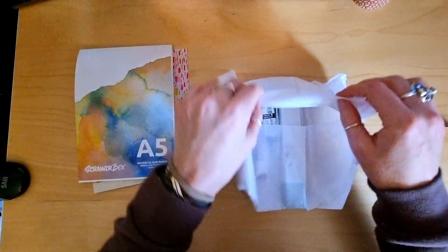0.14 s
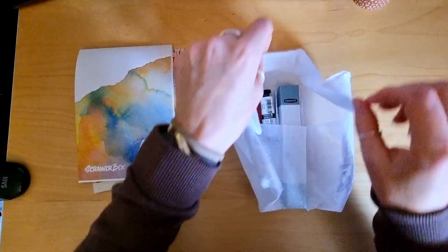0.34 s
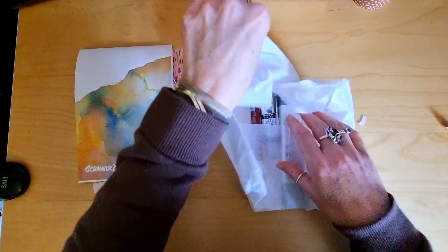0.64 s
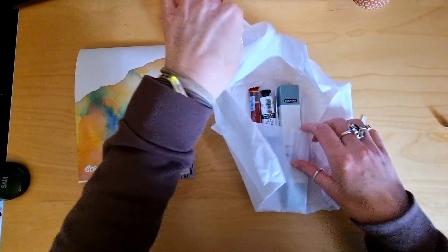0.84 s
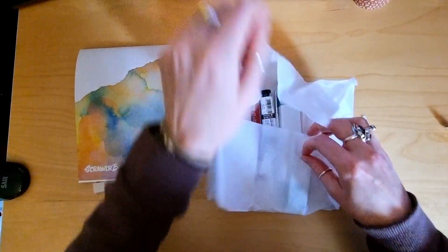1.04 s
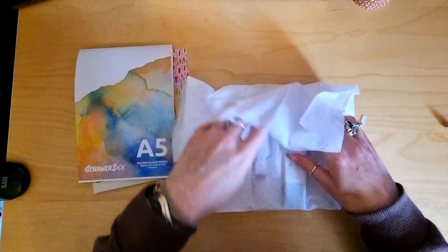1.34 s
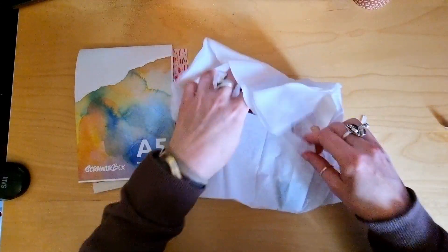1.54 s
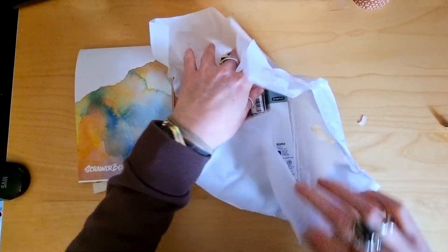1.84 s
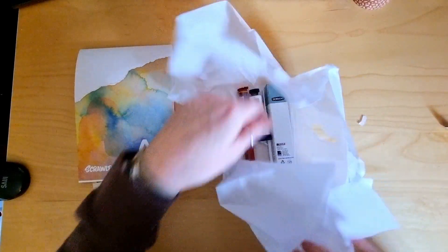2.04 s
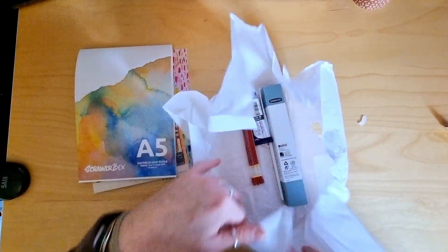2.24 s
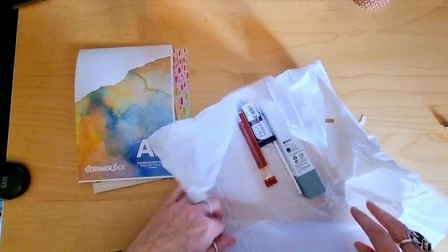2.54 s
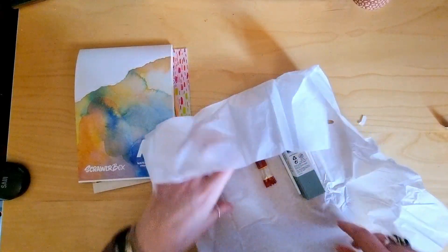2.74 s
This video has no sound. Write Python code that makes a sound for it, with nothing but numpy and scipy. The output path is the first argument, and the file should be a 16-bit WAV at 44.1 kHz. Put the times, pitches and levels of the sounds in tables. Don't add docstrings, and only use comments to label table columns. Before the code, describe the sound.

Thin tissue paper crinkles close by, bright and dry, over soft sliding on wood. Light rustles and snaps begin, with denser crackling around 0.6-1.1 seconds. It thins to tiny ticks near 1.2-1.4, then swells at 1.5-1.7 with a soft table thud. Busy rustling continues from 2, strongest around 2.5-2.8 with a firmer low thump, then eases. Short small-room reflections, faint air noise, stereo phone microphone.

```python
import sys
import numpy as np
from scipy import signal
from scipy.fft import rfft, irfft, next_fast_len
from scipy.io import wavfile
from scipy.ndimage import uniform_filter1d

SR = 44100
rng = np.random.default_rng(int(sys.argv[2]) if len(sys.argv) > 2 else 0)


def put_to_file(sound):
    columns = np.atleast_2d(sound).T
    safe = np.clip(columns, -1, 1)
    whole_steps = np.round(safe * 32767)
    wavfile.write(sys.argv[1], SR, whole_steps.astype(np.int16))


def field_ratio(decibels):
    return 10 ** (np.asarray(decibels, dtype=float) / 20)


N = 127890
T = np.arange(N) / SR

# start_s, effort_db, sliding_db, table_load_db
HANDS = [(0, -41.5, -9, -1), (.05, -50, -1, 1), (.11, -41.5, -4, -3), (.47, -45, -5, 0),
         (.55, -53.5, -1.5, -0.5), (.64, -41.5, -1.5, 2.5), (1.0, -41, -10, 3), (1.14, -45.5, -3.5, -2.5),
         (1.155, -61, -3.5, 2), (1.265, -59, -3.5, 1), (1.365, -69, 8, 5), (1.39, -49.5, -2.5, 2),
         (1.77, -40.5, -3, 1.5), (2.27, -40.5, -5, 1), (2.5, -41.5, -3, 1), (2.7, -34, -15, 3),
         (2.82, -40.5, -12.5, 7.5), (2.9, -41, -14, -12)]
# middle_s, half_length_s, level_db
FOLDS = [(0.158, 0.035, -39), (0.306, 0.013, -45), (0.37, 0.024, -42.5), (0.517, 0.0063, -46),
         (0.707, 0.029, -37.5), (0.775, 0.023, -41.5), (0.889, 0.061, -34.5), (1.06, 0.063, -39.5),
         (1.187, 0.021, -45.5), (1.408, 0.022, -38), (1.521, 0.059, -32.5), (1.645, 0.077, -34.5),
         (1.97, 0.026, -34.5), (2.026, 0.026, -37.5), (2.165, 0.047, -39), (2.318, 0.023, -43.5),
         (2.37, 0.036, -34), (2.427, 0.017, -36), (2.579, 0.039, -33), (2.589, 0.0072, -27),
         (2.64, 0.026, -32), (2.732, 0.018, -37), (2.252, 0.0044, -33.5), (2.795, .012, -38.5),
         (2.77, 0.028, -27.5)]
# start_s, peak_db, body_db
SNAPS = [(0.163, -19.5, -32), (0.2875, -19.5, -8), (0.5601, -27.5, -19), (0.5801, -25.5, -3),
         (0.603, -23.5, -6), (0.6305, -19.5, -26), (0.6759, -14.5, -10), (0.7233, -17.5, -30),
         (0.7562, -16.5, -31), (0.7901, -16, -30), (1.1318, -18.5, -23), (1.1772, -36, -17),
         (1.2326, -28.5, -6), (1.274, -32, 0), (1.3014, -35, 0), (1.3573, -30.5, -15), (1.385, -33, -10),
         (1.4067, -22, -23), (1.4651, -17.5, -2.5), (1.7873, -18.5, -28), (1.8402, -16.5, -35),
         (1.9435, -43, 6), (2.0223, -26, -22), (2.2503, -19, -14), (2.3491, -17, -20), (2.4653, -20.5, -3),
         (2.5232, -16.5, -36), (2.5431, -17, -24), (2.6249, -17, -30), (2.7606, -24.5, -30),
         (.0592, -38, -10), (.0732, -23.5, -36), (.108, -24, -20), (.172, -19.5, -24), (.2374, -36, -14),
         (.297, -33, -16), (.309, -24, -2), (.416, -26, -16), (.455, -24.5, -11), (.819, -25, -22),
         (.861, -32, -15), (.966, -30, -20), (1.19, -28, -16), (1.312, -35, -14), (1.675, -26, -18),
         (1.9145, -22, -12), (1.9594, -30, -14), (2.034, -25, -16), (2.3022, -19.5, -28),
         (2.4179, -35, -16), (2.5551, -16, -25), (2.589, -12.5, -24), (2.801, -18, -30), (2.851, -22, -24)]
# start_s, peak_db, body_db
TICKS = [(0.3234, -20, -20), (0.6874, -14.5, -15), (0.7012, -16, -1.5), (0.7423, -16, -27),
         (0.7738, -24.5, -20), (0.8459, -18.5, -7), (0.9064, -23, -5), (1.3294, -36.5, -1),
         (1.3448, -38, -14), (1.4964, -18.5, 3), (1.5694, -12.5, -17), (1.9646, -35, -17),
         (2.3835, -14, -23), (2.581, -19, -23), (2.7074, -16, -23), (1.224, -30, -16), (1.2405, -40, -13),
         (1.375, -40, -14), (2.5275, -28, -22), (1.948, -30, -6)]
# middle_s, half_length_s, pitch_hz, level_db
POCKETS = [(0.107, 0.0058, 2450, -41), (.16, 0.08, 2100, -53.5), (0.313, 0.006, 940, -44),
           (0.698, 0.02, 2000, -47), (0.906, 0.0062, 1055, -42), (0.265, 0.012, 1830, -49.5),
           (1.045, 0.014, 1240, -47.5), (1.133, 0.0067, 3350, -41.5), (1.535, 0.049, 1190, -43.5),
           (2.142, 0.028, 1220, -48), (2.565, 0.031, 824, -47.5), (.365, .03, 1750, -57),
           (0.586, 0.015, 960, -51), (.85, 0.0094, 1310, -57), (1.088, 0.015, 4000, -46.5),
           (1.49, 0.011, 2380, -48.5), (1.67, .012, 4650, -49), (1.918, 0.011, 1250, -47),
           (1.98, .03, 1130, -49), (2.21, 0.012, 1400, -51.5), (2.252, .01, 1250, -50),
           (2.46, 0.017, 2160, -48), (2.525, 0.0049, 3400, -45), (2.578, 0.0048, 2930, -48)]
# start_s, peak_db, knock_hz, push_db, ring_db
THUDS = [(.004, -45, 185, -42, -4), (0.513, -42, 190, -30, -18), (0.701, -35.5, 216, -30, -9),
         (0.905, -33, 305, -39, -23), (1.061, -62, 200, 16, -9), (1.39, -57, 202, 14, -6),
         (1.447, -30, 250, -14, -9), (1.47, -57, 200, 19, -15), (1.56, -46, 261, -20, -1.5),
         (2.273, -53, 200, 13, -7), (2.31, -41, 220, 5, -6), (2.434, -50, 200, 23, -3),
         (2.56, -42, 204, 12, -1.5), (2.85, -59, 200, 20, -8), (2.7757, -24.5, 263, -2, -6.5)]
# frequency_hz, density_db
PAPER_COLOUR = [(1500, -7), (2400, -6.5), (3300, 0), (9000, 0.5), (13000, 0), (15300, 2.5)]
# frequency_hz, density_db
SLIDE_COLOUR = [(250, -6), (500, -2.5), (650, -7), (850, -1), (1250, -0.5), (2000, -5), (3200, -3),
                (6000, -15)]
# pitch_hz, level_db, t60_s
TABLE_MODES = [(127.5, -7, 0.66), (173, -9, 0.57), (191, 0.5, 0.19), (245.5, -7, 0.3), (505.7, -4, 0.098),
               (850, -18, 0.11)]
# frequency_hz, t60_s
ROOM_DECAY = [(200, 0.58), (1000, 0.21), (5000, 0.15), (14000, 0.057)]
# frequency_hz, density_db
AIR_COLOUR = [(40, -10), (100, -12), (300, -4), (520, -9), (2330, -8), (5400, -43), (15500, -27)]
# frequency_hz, side_minus_mid_db
WIDTH = [(60, -22), (150, -11.5), (380, -8), (950, -8.5), (2380, -2), (5980, 0.5), (15000, 0.5)]
# start_s, left_minus_right_db
PAN = [
    (0.0, -1.5),
    (0.09, 0),
    (0.8, -2.0),
    (1.52, 0),
    (2.83, -0.5),
    (2.86, -1.5),
    (2.9, 1.5),
]
# frequency_hz, gain_db
OVERALL_RESPONSE = [(20, -24), (50, -14.5), (95, -9.5), (120, -2), (15450, 2), (15850, -19), (16000, -69)]

CREASES_PER_S = 700
CRACKLE_DB, RUSTLE_DB, SLIDE_DB, SNAP_DB = -7.5, -6, -2.3, -13
HUM_DB, THUD_DB, KNOCK_DB = -54, -1, 2.5
REVERB_DB, AIR_DB = -9.5, -70


def evened(x):
    return x / np.sqrt(np.mean(x ** 2) + 1e-20)


def add(mix, s, sound):
    part = mix[..., max(round(s * SR), 0):][..., :sound.shape[-1]]
    part += sound[..., :part.shape[-1]]


def read(points, hz):
    f, value = np.transpose(points)
    return np.interp(np.log(hz + 1), np.log(f + 1), value)


def colour(x, points):
    n = next_fast_len(x.shape[-1])
    gain = field_ratio(read(points, np.fft.rfftfreq(n, 1 / SR)))
    return irfft(rfft(x, n) * gain, n)[..., :x.shape[-1]]


def noise():
    return rng.standard_normal((2, N))


def wander(seconds):
    size = max(int(seconds * SR), 1)
    return evened(uniform_filter1d(uniform_filter1d(rng.standard_normal(N), size), size))


def hands(column):
    return np.interp(T, np.transpose(HANDS)[0], np.transpose(HANDS)[column])


def effort(fold_share):
    power = field_ratio(2 * hands(1))
    for middle, half, db in FOLDS:
        power = power + fold_share * field_ratio(2 * db) * np.exp(-((T - middle) / half) ** 4)
    return np.sqrt(power)


def paper():
    snaps, bodies = snapping_creases()
    unit = rng.standard_normal(N)
    bright = colour(effort(0.63) * crackle() + snaps, [(700, -11), *PAPER_COLOUR])
    bright = bright / colour(unit, PAPER_COLOUR).std()
    dull = colour(sliding() + bodies, SLIDE_COLOUR) / colour(unit, SLIDE_COLOUR).std()
    return bright + dull + air_pockets()


def crackle():
    size = field_ratio(2 * np.minimum(rng.exponential(1, N), 3.5))
    size = size * (rng.random(N) < CREASES_PER_S / SR * field_ratio(1.5 * wander(0.008)))
    kind = rng.integers(0, 40, N)
    creases = np.zeros((2, N))
    for k in range(40):
        grain = burst(0.00057 * 5 ** rng.random(), 2000 * 7 ** rng.random(), 9.2)
        grain = grain / np.linalg.norm(grain)
        creases += signal.oaconvolve((size * (kind == k))[None], grain, axes=1)[:, :N]
    rustle = noise() * field_ratio(2.9 * wander(0.01) + 0.27 * wander(0.019))
    return patchy(field_ratio(CRACKLE_DB) * evened(creases) + field_ratio(RUSTLE_DB) * evened(rustle))


def burst(seconds, hz, tilt_db, rise=0.73):
    t = np.arange(int(0.055 * SR)) / max(seconds * SR, 4)
    x = colour(rng.standard_normal((2, len(t))), [(hz / 2, 0), (hz, tilt_db), (hz * 2, 0)])
    peak_to_one = (1 + rise) * (1 + 1 / rise) ** rise
    return evened(x) * (1 - np.exp(-t / rise)) * np.exp(-t) * peak_to_one


def patchy(x):
    z = signal.stft(x, nperseg=256)[2]
    field = rng.standard_normal(z.shape[:0:-1])
    field = uniform_filter1d(field, size=5, axis=0)
    field = uniform_filter1d(field, size=7, axis=1).T
    z = z * field_ratio(1.6 * evened(field))
    return evened(signal.istft(z, nperseg=256)[1][:, :N])


def snapping_creases():
    snaps, bodies = np.zeros((2, N)), np.zeros((2, N))
    for rows, seconds in ((SNAPS, 0.0022), (TICKS, 0.0015)):
        for s, db, body_db in rows:
            snap = burst(seconds, 3000 * 4 ** rng.random(), 1.5, rise=0.7)
            add(snaps, s, field_ratio(db + SNAP_DB) * snap)
            add(bodies, s, field_ratio(db + body_db + SNAP_DB) * burst(0.5 * seconds, 1200, 0))
    return snaps, bodies


def sliding():
    rub = noise() * field_ratio(2.8 * wander(0.0037) + 0.84 * wander(0.073))
    return effort(0.5) * field_ratio(hands(2) + SLIDE_DB) * evened(rub)


def air_pockets():
    out = np.zeros((2, N))
    grain = noise() * field_ratio(2.5 * wander(0.0046))
    t = np.arange(-6000, 6000) / SR
    width = 1.85
    for middle, half, hz, db in POCKETS:
        part = np.take(grain, np.round((middle + t) * SR).astype(int), axis=1, mode="wrap")
        band = colour(part, [(hz / width, -30), (hz, 0), (hz * width, -30)])
        sound = field_ratio(db) * evened(band) * np.exp(-(t / half) ** 2)
        start = middle + t[0]
        add(out, start, sound[:, max(-round(start * SR), 0):])
    return out


def table():
    t = np.arange(SR) / SR
    ring = sum(field_ratio(db - 60 * t / t60) * np.sin(2 * np.pi * hz * t) for hz, db, t60 in TABLE_MODES)
    return hum(ring) + thuds(ring, t)


def hum(ring):
    shake = noise() * field_ratio(0.17 * (hands(1) + 33) + hands(3) + 0.77 * wander(0.029))
    return field_ratio(HUM_DB) * signal.fftconvolve(shake, ring[None] / np.linalg.norm(ring), axes=1)[:, :N]


def thuds(ring, t):
    out = np.zeros((2, N))
    boom = 0.55 * np.sin(2 * np.pi * TABLE_MODES[0][0] * t)
    boom = boom * np.exp(-t / 0.09) * (1 - np.exp(-t / 0.049))
    modes = 1.6 * ring / abs(ring).max() + boom
    for s, db, hz, push_db, ring_db in THUDS:
        knock = np.sin(2 * np.pi * hz * t) + 0.14 * np.sin(3.8 * np.pi * hz * t)
        knock = field_ratio(KNOCK_DB) * np.exp(-t / 0.0055) * knock
        push = field_ratio(push_db) * np.sin(2 * np.pi * 62 * t)
        push = push * np.exp(-t / 0.019) * (1 - np.exp(-t / 0.0069))
        hit = -(field_ratio(ring_db) * modes + knock) * (1 - np.exp(-t / 0.0018))
        add(out, s, field_ratio(db + THUD_DB) * np.outer([1, -0.4], hit + push))
    return out


def room(x):
    out = np.zeros((2, N))
    at = np.arange(120, SR // 2 - 20, 20)
    for k in range(3):
        taps = np.zeros((2, SR // 2))
        places = at + rng.integers(0, 20, (2, len(at)))
        np.put_along_axis(taps, places, rng.choice([-1., 1.], (2, len(at))), 1)
        hz, t, z = signal.stft(taps, SR, nperseg=256)
        z = z * field_ratio(-60 * t / read(ROOM_DECAY, hz)[:, None])
        tail = signal.istft(z, SR, nperseg=256)[1]
        turn = np.sqrt(2 / 3) * np.cos(2 * np.pi * (9 * T + k / 3))
        out += signal.fftconvolve(x * turn, tail / np.linalg.norm(tail[0]), axes=1)[:, :N]
    return out


def air():
    return field_ratio(AIR_DB) * evened(colour(noise(), AIR_COLOUR))


def scene():
    sheet = paper()
    mid, side = sheet + field_ratio(REVERB_DB) * room(sheet) + table() + air()
    side = colour(side, WIDTH)
    pan = np.interp(T, *np.transpose(PAN))
    left = (mid + side) * field_ratio(1.16 + pan / 2)
    right = (mid - side) * field_ratio(1.03 - pan / 2)
    return np.array([left, right])


def band_limit(x):
    return signal.sosfilt(signal.butter(12, 16720, fs=SR, output="sos"), x)


def record(dry):
    mix = colour(dry, OVERALL_RESPONSE)
    return band_limit(mix)


dry = scene()
out = record(dry)
put_to_file(out)
```